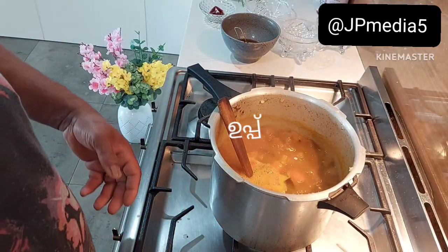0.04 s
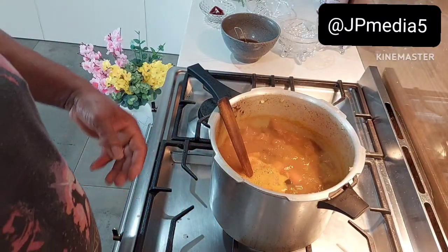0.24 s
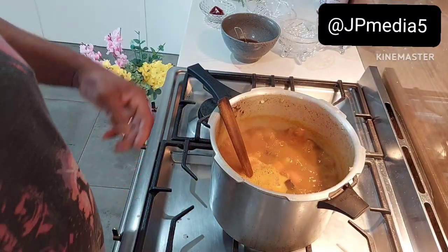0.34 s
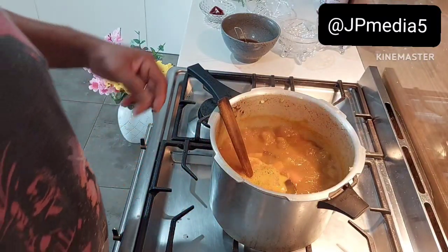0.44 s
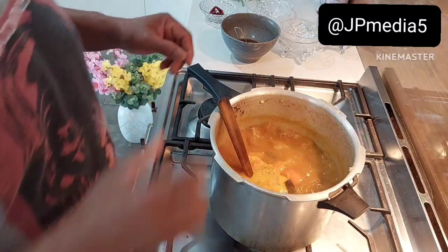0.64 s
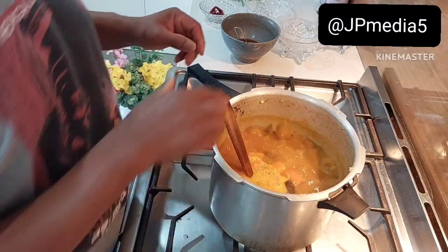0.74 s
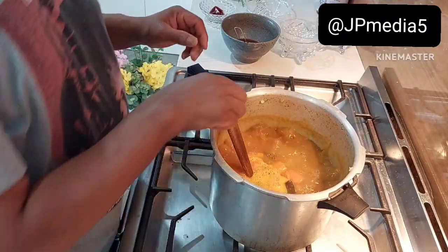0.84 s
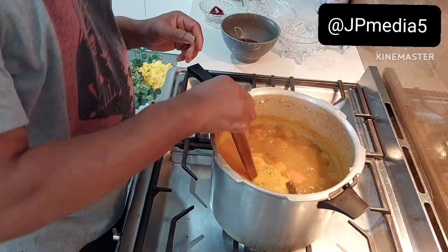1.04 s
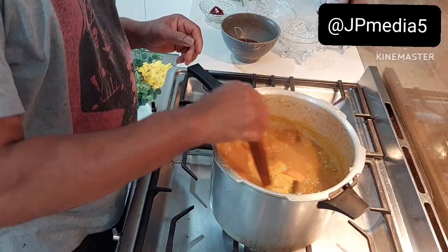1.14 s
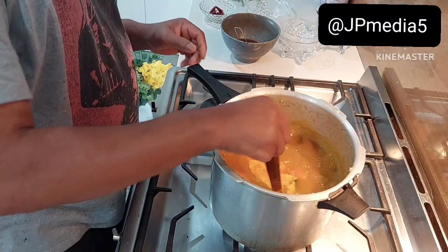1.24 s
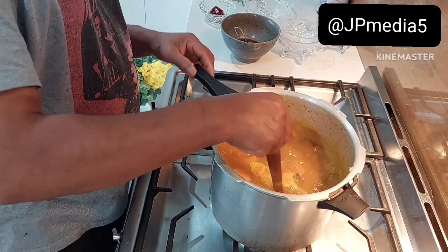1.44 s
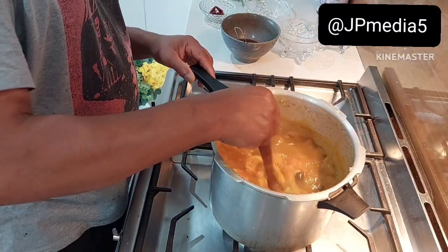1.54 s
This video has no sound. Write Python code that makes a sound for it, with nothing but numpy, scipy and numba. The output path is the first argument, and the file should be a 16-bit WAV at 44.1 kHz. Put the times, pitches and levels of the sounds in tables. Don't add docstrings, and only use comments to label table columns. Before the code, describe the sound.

Thick curry simmers in a deep steel pot, close up: hollow wet plops, tiny spits, soft flame hiss and low hum throughout. Light spoon taps open it. A cupboard door bangs loudly at 0.2 seconds with a latch rattle, again at 0.4, ringing through the hard kitchen until a cut at 1.0. Around 1.2 a wooden spoon knocks and scrapes; airy steam swells at 1.3 and fades by 1.5 as bubbling continues.

```python
import sys
import numpy as np
from scipy import signal
from scipy.io import wavfile
from scipy.ndimage import uniform_filter1d, minimum_filter1d
from numba import njit

SR = 44100
rng = np.random.default_rng(int(sys.argv[2]) if len(sys.argv) > 2 else 0)


def to_wav(sig):
    pcm = np.clip(np.atleast_2d(sig), -1, 1) * 32767
    pcm = np.round(pcm).astype(np.int16)
    wavfile.write(sys.argv[1], SR, pcm.T)


def amplitude_ratio(level_db):
    exponent = np.asarray(level_db, float) / 20
    return 10 ** exponent


N = 70560
T = np.arange(N) / SR


def level(x, db):
    return x * amplitude_ratio(db) / np.sqrt(np.mean(x ** 2))


def curve(table, column):
    points = np.array(table)
    return np.interp(T, points[:, 0], points[:, column])


@njit
def svf(x, hz, width):
    y, band_state, low_state = np.empty(len(x)), 0., 0.
    for i in range(len(x)):
        g = np.tan(np.pi * hz[i] / SR)
        k = width / hz[i]
        v = (band_state + g * (x[i] - low_state)) / (1 + g * (g + k))
        band_state, low_state = 2 * v - band_state, low_state + 2 * g * v
        y[i] = k * v
    return y


def band(x, hz, width):
    return svf(x + 1e-18, hz + 0 * T[:len(x)], float(width))


def passband(x, low_hz, top_hz):
    return signal.sosfilt(signal.butter(N=4, Wn=[low_hz, top_hz], btype="band", fs=SR, output="sos"), x)


def ring(x, modes):
    out = 0
    for hz, db, t60 in modes:
        pole = np.exp((2j * np.pi * hz - np.log(1000) / max(t60, .003)) / SR)
        out = out + amplitude_ratio(db) * signal.lfilter([0, pole.imag], [1, -2 * pole.real, abs(pole) ** 2], x + 1e-18)
    return out


def add(out, s, sound):
    i = max(int(s * SR), 0)
    out[i:i + len(sound)] += sound[:max(N - i, 0)]


def walk(rate):
    k = int(SR / rate)
    steps = np.repeat(rng.standard_normal(N // k + 1), k)
    return 2.2 * uniform_filter1d(uniform_filter1d(steps, k), k)[:N]


def flame():
    # frequency in Hz, level in dB per Hz
    spectrum = np.array([(30, -17), (100, 0.5), (300, -6), (600, 0), (1300, -11.5), (3300, -23),
                         (7000, -30), (14000, -19.5)])
    out, swell = 0, walk(2.6)
    for hz in 35 * 2 ** np.arange(0, 9.1, .5):
        db = np.interp(np.log(hz), np.log(spectrum[:, 0]), spectrum[:, 1]) + .3 * swell + .7 * walk(13.6)
        out = out + amplitude_ratio(db) * band(band(rng.standard_normal(N), hz, hz / 2), hz, hz / 2)
    whistle = band(rng.standard_normal(N), 4320, 270)
    return level(out, -55) + level(whistle, -73.5)


def spoon_taps():
    # time in seconds, peak in dB, pitch in Hz, t60 in seconds
    taps = [(.0044, -32, 996, 0.088), (0.016, -37, 1166, 0.11), (0.026, -38.5, 1188, 0.096),
            (0.11, -36, 1160, 0.049), (0.121, -34.5, 1050, 0.12), (0.141, -38.5, 1100, 0.11),
            (0.1732, -34, 990, 0.031), (0.196, -33.5, 1430, 0.14), (0.927, -25.5, 1110, 0.089),
            (1.124, -37, 1100, 0.21), (1.1315, -25.5, 1910, 0.01), (1.1797, -24, 1620, 0.007),
            (1.196, -25, 1450, .012), (1.2063, -22, 1850, 0.01), (1.2088, -22, 2600, 0.011),
            (1.227, -28, 1300, 0.01), (1.478, -46, 1476, .015), (1.494, -45, 1510, 0.012),
            (1.539, -48, 1750, 0.013), (1.3709, -36, 1546, 0.033), (1.4554, -36.5, 970, 0.026),
            (1.5689, -53, 1500, 0.031)]
    out = np.zeros(N)
    knock = np.r_[np.hanning(12), -np.hanning(12), np.zeros(6000)]
    for s, db, hz, t60 in taps:
        hit = ring(knock, [(hz, 0, t60), (hz * 0.735, -3, t60 * 0.2), (hz * 1.3, -6, t60 * 0.52)])
        add(out, s - .0005, amplitude_ratio(db) * hit / np.abs(hit).max())
    return out


def kitchen(x):
    # band centre in Hz, level in dB, t60 in seconds
    decays = [(359.4, 2, 0.81), (498.3, 0.5, 0.68), (766.6, -2, 0.84), (1100, 0.5, 0.97),
              (1474, -1.5, 1.16), (1912, 0.5, 1.2), (2530, 3, 0.59), (3460, 0, 0.69), (191, -3.5, 0.93)]
    noise = rng.standard_normal(N) * np.clip(T / 0.01, 0, 1)
    tail = 0
    for hz, db, t60 in decays:
        tail = tail + amplitude_ratio(db - 60 * T / t60) * band(band(noise, hz, hz / 2.05), hz, hz / 1.95)
    return signal.fftconvolve(x, tail / 30)[:N]


def blip(hz, cycles, glide):
    samples = cycles / hz * SR
    u = np.arange(int(samples)) / samples
    return np.sin(np.pi * u ** 0.68) * np.sin(2 * np.pi * cycles * (u + glide * u ** 2 / 2))


def curry():
    # time in seconds, peak in dB, pitch in Hz, drive of the air column in dB
    bubbles = [(0.063, -47, 610, -14), (0.079, -29.5, 703, -3.5), (0.083, -33, 533, -2.5),
               (0.092, -30, 562, -7.5), (0.109, -32.5, 666, -2), (0.1235, -27.5, 626, -3.5),
               (0.171, -43, 680, -25), (0.604, -25, 617, -9.5), (0.684, -42, 585, -6),
               (0.842, -26, 570, -3.5), (0.85, -42, 550, -0.5), (0.858, -26.5, 533, -6),
               (1.033, -42, 540, -31), (1.085, -47.5, 462, 1.5), (1.098, -29.5, 525, -4),
               (1.109, -32.5, 537, -16), (1.146, -32, 553, -6.5), (1.172, -31, 507, -32),
               (1.346, -30.5, 551, -11.5), (1.399, -32.5, 597, -9), (1.454, -52, 660, 3),
               (1.476, -36, 525, -3), (1.503, -61, 500, -13.5), (1.521, -49, 516, 4),
               (1.544, -30.5, 611, -8), (1.572, -56, 604, -27), (1.593, -41, 530, -15)]
    # frequency in Hz, level in dB, t60 in seconds
    air_modes = [(476, -5.5, 0.23), (525, 2, 0.13), (597.5, -4, 0.051), (683, 2, 0.059), (1110, -15, .08)]
    # time in seconds, peak in dB, pitch in Hz
    spits = [(0.0816, -38, 10400), (0.4344, -34, 5800), (0.4887, -38, 5300), (0.535, -30, 13300),
             (0.8068, -29.5, 9500), (0.8614, -35.5, 9700), (0.893, -32, 9900), (1.0424, -45, 9340),
             (1.0984, -35, 9100), (1.131, -40, 9500), (1.1524, -43, 10400)]
    simmer_per_s, simmer_db, simmer_scatter_db = 98, -59, 1.5
    pops, drive, splat, small, spit = np.zeros((5, N))
    for s, db, hz, ring_db in bubbles:
        bubble = amplitude_ratio(db) * blip(hz, 5.65, 0.075)
        add(pops, s - .002, bubble)
        add(drive, s - .002, amplitude_ratio(ring_db) * bubble)
        add(splat, s - .002, amplitude_ratio(db - 8.5) * np.exp(-T[:400] / 0.001))
    for when, size, pitch in rng.random((200, 3)):
        gain = amplitude_ratio(-simmer_scatter_db * np.log(size))
        add(small, when * 200 / simmer_per_s, gain * blip(380 * 3.1 ** pitch, 1.81, 0.25))
    for s, db, hz in spits:
        sizzle = band(rng.standard_normal(600), hz, 1700) * np.exp(-T[:600] / 0.0044)
        add(spit, s - .001, amplitude_ratio(db - 3) * sizzle)
    small = level(small, simmer_db)
    air = ring(drive + small, air_modes) * amplitude_ratio(-41.0)
    return pops + small + air + band(splat * rng.standard_normal(N), 1400, 1600) + spit


def thuds():
    # time in seconds, peak in dB, pitch in Hz, t60 in seconds
    bumps = [(0.078, -55, 88.4, 1), (0.23, -31, 123.4, 0.11), (.228, -33, 55, 0.46),
             (0.27, -33.5, 74, 0.17), (0.42, -26.5, 118, 0.084), (0.418, -35, 52, 0.43),
             (0.47, -36, 91, .15), (1, -40.5, 68, 0.11), (0.075, -50, 215, 0.086),
             (1.1794, -22, 290, 0.017), (1.7, -30, 155, 0.04)]
    out, t = np.zeros(N), T[:30000]
    for s, db, hz, t60 in bumps:
        add(out, s, amplitude_ratio(db - 60 * t / t60) * np.clip(t * hz, 0, 1) * np.sin(2 * np.pi * hz * t))
    return out


def latch():
    # time in seconds, level in dB, decay in seconds
    rattles = [
        (0.206, -38, 0.041),
        (0.242, -43, 0.012),
        (.404, -85, 0.0058),
    ]
    envelope = np.zeros(N)
    for s, db, decay in rattles:
        add(envelope, s, amplitude_ratio(db) * np.exp(-T[:8000] / decay))
    return passband(envelope * rng.standard_normal(N), 1700, 9900)


def door():
    # time in seconds, peak in dB, centre of the part that speaks in Hz
    contacts = [(.2098, 6, 1330), (.2125, -2.5, 903), (.2148, -3, 820), (.226, -4, 1210), (.231, -8, 780),
                (.236, -8, 660), (.245, -11.5, 1420), (.2525, -10, 1100), (.263, -11.5, 1500),
                (0.2644, -4, 920), (.269, -7, 880), (.272, -6.5, 970), (.286, -11.5, 1410),
                (.289, -10.5, 1410), (.299, -12.5, 1000), (.339, -14, 1430), (.3958, -5, 1310),
                (.3975, -4.5, 1440), (.4, -2, 580), (.4028, -4.5, 640), (.4062, -2.5, 1310),
                (.4078, -1, 1100), (.4112, -3.5, 666), (.4135, -8.5, 1150), (.4175, -9.5, 940),
                (.422, -15, 600), (.4275, -11, 790)]
    # frequency in Hz, level in dB, t60 in seconds
    panel = [(334, -1, 0.049), (492.5, -0.5, 0.086), (570.5, 5.5, 0.036), (660, 3.5, 0.031),
             (736, -4, 0.034), (845, 12, 0.01), (220, -23, 0.054), (1110, 7, 0.014), (2890, -3.5, 0.0077),
             (1332, 11.5, 0.015), (1449, -4, 0.034), (1688, 6.5, 0.012), (2092, 0.5, 0.014),
             (2396, 2.5, 0.0073)]
    push_s, focus_db = 0.00053, 6
    out, t = np.zeros(N), T[:6000]
    push = t / push_s * np.exp(-t / push_s)
    for s, db, centre in contacts:
        hit = 0
        for hz, mode_db, t60 in panel:
            detune, uneven, phase = rng.standard_normal(3)
            force = push * np.cos(2 * np.pi * hz * t + 3 * phase)
            gain_db = mode_db + 0.99 * uneven - focus_db * np.log2(hz / centre) ** 2
            hit = hit + ring(force, [(hz * (1 + 0.019 * detune), gain_db, t60)])
        add(out, s - .001, amplitude_ratio(db) * hit / np.abs(hit).max())
    return passband(out, 124, 3600)


def splinter(bang):
    envelope = uniform_filter1d(np.abs(bang), size=60)
    return passband(envelope * rng.standard_normal(N), 156, 2700)


def spoon_drag():
    # time in seconds, level in dB
    stroke = [
        (1.177, -42.5),
        (1.19, -37),
        (1.208, -38.5),
        (1.23, -35),
        (1.25, -37),
        (1.32, -49.5),
        (1.42, -58.5),
    ]
    # frequency in Hz, width in Hz, level in dB
    resonances = [(293, 230, -1), (767, 225, 6), (1600, 490, 6.5), (1820, 270, -5), (2630, 290, -1.5),
                  (2840, 81, -3), (8000, 1900, -1)]
    grains_per_s, scatter_db = 6400, 7
    chance, size, sign = rng.random((3, N))
    grit = (chance < grains_per_s / SR) * amplitude_ratio(scatter_db * 2 * size) * np.sign(sign - .5)
    body = 0
    for hz, width, db in resonances:
        body = body + amplitude_ratio(db) * level(band(band(band(grit, hz, width), hz, 2 * width), hz, 2 * width), 0)
    contact = np.clip((T - stroke[0][0]) / 0.004, 0, 1) * np.clip((stroke[-1][0] - T) / 0.036, 0, 1)
    return level(body, 0) * amplitude_ratio(curve(stroke, 1) + 0.47 * walk(90.9)) * contact


def steam():
    # time in seconds, level in dB, centre in Hz
    flow = [
        (1.178, -56, 8000),
        (1.186, -48, 8000),
        (1.24, -45.5, 8800),
        (1.31, -40, 11500),
        (1.38, -45.5, 11230),
        (1.45, -51, 9960),
        (1.54, -60.5, 9800),
    ]
    hiss = svf(rng.standard_normal(N), curve(flow, 2), 7000.)
    return level(passband(hiss, 3700, 22000), 0) * amplitude_ratio(curve(flow, 1) + .6 * walk(33.0))


def scene():
    # time in seconds, gain in dB
    flame_gain = [(.2, 8.5), (.27, 11), (.45, 7), (.6, 4)]
    # time in seconds, gain in dB
    fader = [(0, 2.5), (.2, -0.93), (.4, -0.5), (.9, -3.5), (1.005, -6.5), (1.06, 0.5), (1.6, -0.5)]
    change_s, change_fade_s = 1.0, 0.031
    bang, pot = door(), curry() + spoon_taps() + spoon_drag()
    crack = splinter(bang)
    before_change = np.clip((change_s - T) / change_fade_s, 0, 1)
    ringing = amplitude_ratio(-6.5) * kitchen(bang + amplitude_ratio(-8.5) * crack) * before_change
    mid = bang + amplitude_ratio(-13.5) * crack + latch() + ringing + thuds()
    mid = mid + pot + amplitude_ratio(-17.5) * kitchen(pot)
    mid = (mid + steam() + flame() * amplitude_ratio(curve(flame_gain, 1))) * amplitude_ratio(curve(fader, 1))
    side = amplitude_ratio(-14.5) * np.roll(mid, 90) + amplitude_ratio(-18.0) * band(np.roll(mid, 300), 280, 200)
    side = amplitude_ratio(-22) * side
    return np.array([mid + side, mid - side])


def thin_patches(x):
    # start in seconds, end in seconds, low in Hz, top in Hz, share dropped 0-1
    thinned = [(.07, .16, 6600, 7300, .6), (.225, .275, 10800, 14200, .7), (.275, .39, 7500, 14200, .62),
               (.3, .39, 4500, 7500, .35), (.412, .455, 8000, 14200, .7), (.455, .56, 5000, 13000, .2),
               (.6, .85, 3300, 7500, .1), (1.165, 1.21, 3300, 4900, .5), (1.21, 1.27, 3850, 4950, 1),
               (1.265, 1.335, 3150, 5000, .9), (1.335, 1.41, 3050, 4000, .75), (1.46, 1.52, 3300, 3800, .5)]
    hz, s, z = signal.stft(x, SR, nperseg=1024, noverlap=768)
    patches = rng.random((len(hz) // 5 + 1, len(s) // 8 + 1))
    patches = np.repeat(np.repeat(patches, 5, axis=0), 8, axis=1)[:len(hz), :len(s)]
    for start, end, low, top, share in thinned:
        inside = ((hz >= low) & (hz < top))[:, None] & ((s >= start) & (s < end))
        z = z * np.where(inside & (patches < share), .005, 1)
    return signal.istft(z, SR, nperseg=1024, noverlap=768)[1][:, :N]


def limit(x):
    room = np.minimum(.97 / (np.abs(x).max(axis=0) + 1e-9), 1)
    return x * uniform_filter1d(minimum_filter1d(room, size=301), size=301)


def band_limit(x):
    return signal.sosfilt(signal.butter(12, 15920, fs=SR, output="sos"), x)


def record(dry):
    cut = signal.sosfilt(signal.ellip(10, .2, 80, 14750, fs=SR, output="sos"), dry)
    cut = signal.sosfilt(signal.butter(2, 40, "high", fs=SR, output="sos"), cut)
    mix = limit(thin_patches(cut))
    return band_limit(mix)


dry = scene()
out = record(dry)
to_wav(out)
```